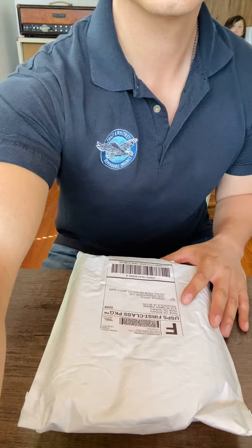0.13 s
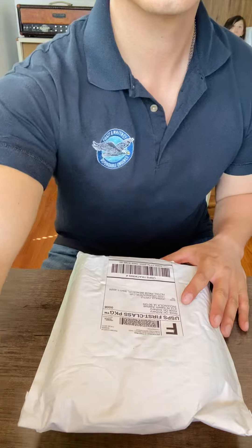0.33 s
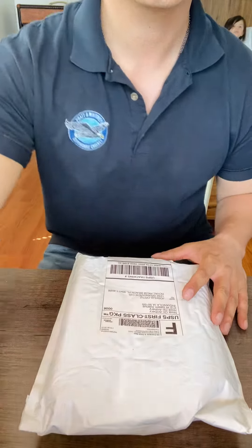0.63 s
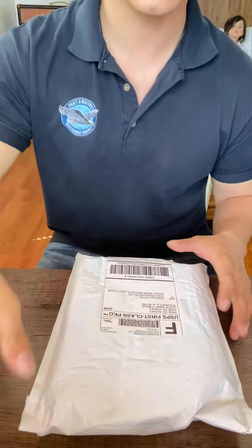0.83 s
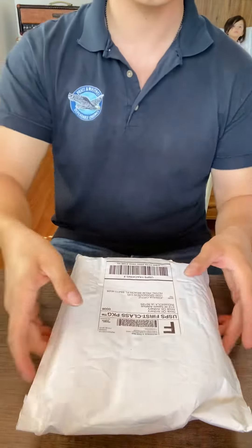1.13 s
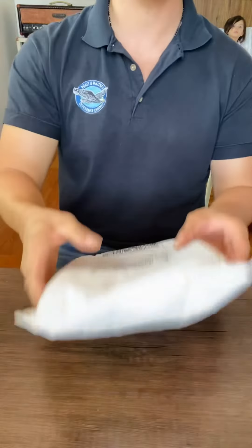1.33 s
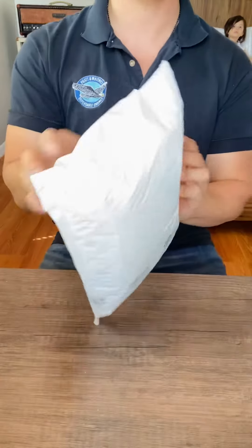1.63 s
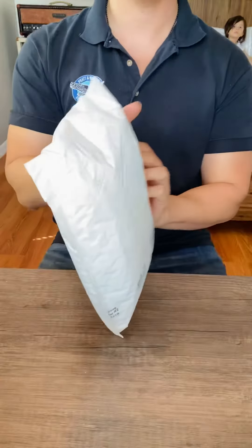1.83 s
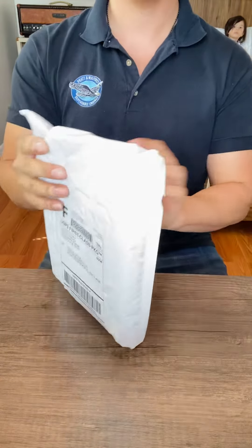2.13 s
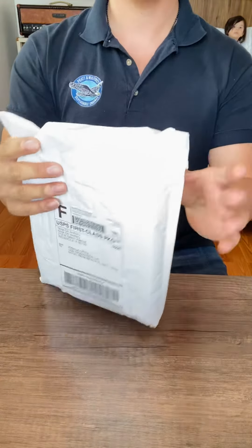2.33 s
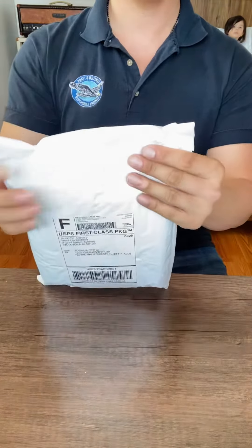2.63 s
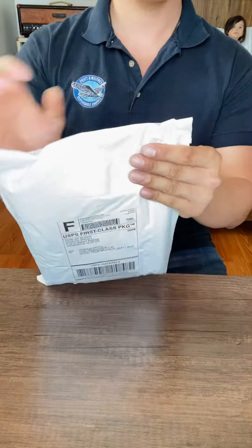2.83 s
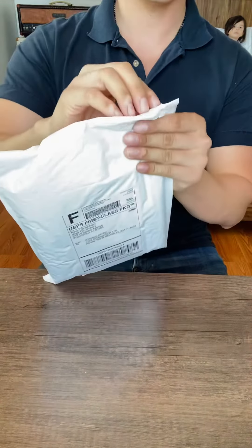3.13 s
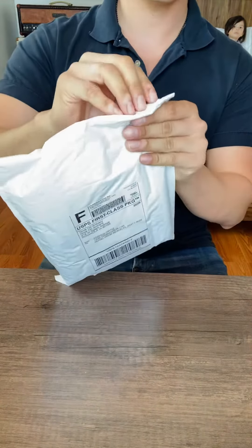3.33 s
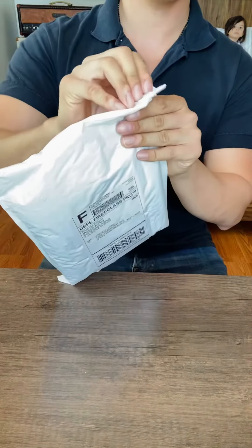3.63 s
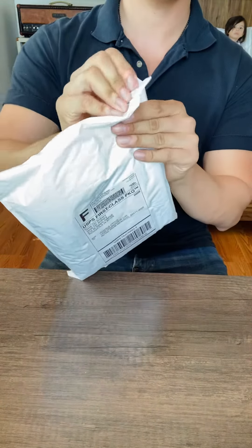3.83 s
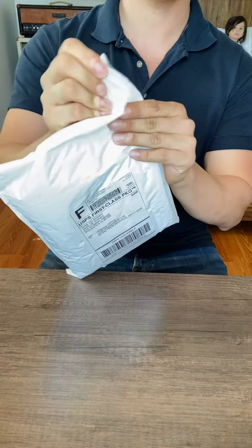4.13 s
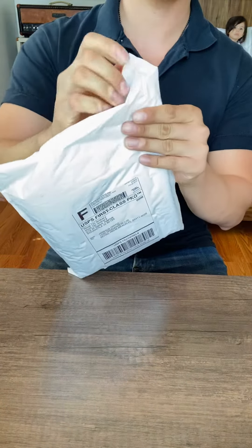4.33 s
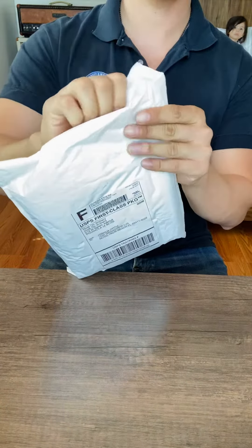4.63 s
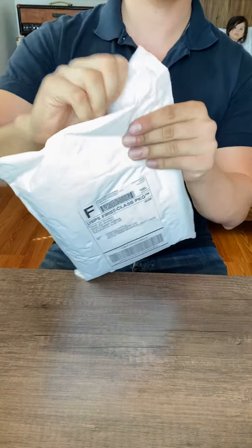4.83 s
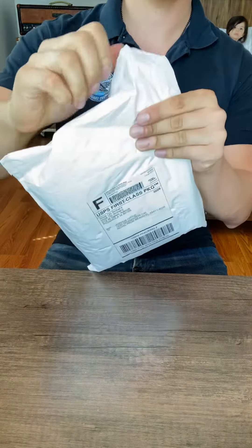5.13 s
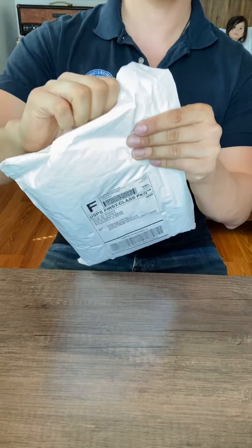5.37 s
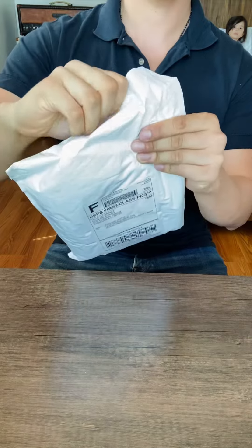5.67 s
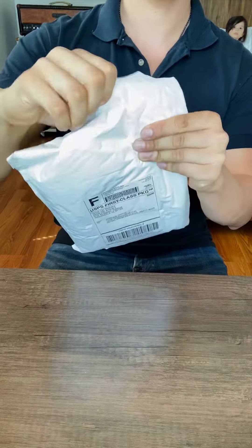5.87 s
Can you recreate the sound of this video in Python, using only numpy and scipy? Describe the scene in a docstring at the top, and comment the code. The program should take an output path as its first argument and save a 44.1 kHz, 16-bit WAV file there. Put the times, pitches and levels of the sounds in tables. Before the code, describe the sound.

Quiet room with a steady low rumble. Soft touches on the microphone come first, then a barely audible hiss of skin on film. From about one second, fine bright crinkling, dull scuffing and popping creases follow the handling of a plastic pouch. It is torn by three abrupt rips, the later ones with stronger low bumps. Close stereo pickup, short room reflections.

```python
"""A low room rumble runs throughout; two soft low bumps, then a palm slides faintly over film.
A plastic mailer is lifted off a table, turned in the hands and torn open in three short rips.
Fingers rub the film into a fine crackle of tiny clicks over hiss, and creases snap as short bursts.
Each rip is a quick run of slips, coloured by fixed resonances of the table; the bumps are sagging low tones.
All of it is close to a pair of microphone ports, with three room echoes taking turns behind."""
import sys
import numpy as np
from scipy import signal
from scipy.fft import rfft, irfft, next_fast_len
from scipy.io import wavfile

SR = 44100
rng = np.random.default_rng(int(sys.argv[2]) if len(sys.argv) > 2 else 0)


def digitize_waveform(pressure):
    """Quantize a signal to 16-bit integers and store it at the path in sys.argv[1].

    Rows of a 2-D input are taken as channels; values are limited to [-1, 1].
    """
    field = np.atleast_2d(pressure).T
    bounded = np.clip(field, -1, 1)
    quanta = np.round(bounded * 32767).astype(np.int16)
    wavfile.write(sys.argv[1], SR, quanta)


N = 264600
TIME = np.arange(N) / SR  # s
TAPS = 4096  # length of filters and single clicks, samples
HZ = np.fft.rfftfreq(TAPS, 1 / SR)
AGE = np.arange(TAPS) / SR  # s since a click began

# Colours are relative spectra: columns f/Hz, level per Hz/dB.
# steady rumble of the room
ROOM_TONE_COLOUR = [(15, -61), (30, -31), (45, 5), (65, 3), (120, -3.5), (200, -17), (330, -21.5),
                    (550, -38), (1200, -57), (5000, -56), (10000, -56), (14000, -77)]
ROOM_TONE_DB = -53.5
# skin on flat film
PALM_COLOUR = [(200, -6), (850, -5), (1300, -0.5), (2200, -1.5), (4000, -5.5), (7000, -8), (11000, -16),
               (14000, -29)]
# crackling and snapping film
FILM_COLOUR = [(150, -17.5), (330, -3.5), (650, -3.5), (1000, -4), (1380, 4.5), (1700, 0.5), (2050, 3.5),
               (2500, -2), (3100, 0), (5400, -1.5), (7500, -5), (11000, -7.5), (12500, -11), (16000, -33)]
# dull scuffing under the crackle
SCUFF_COLOUR = [(70, -13), (150, 1.5), (350, -0.5), (700, -1.5), (1300, -6.5), (2500, -34.5)]
# a slip of the tear
TEAR_COLOUR = [(60, -32), (130, -10), (310, -9), (700, -11.5), (1000, -9.5), (1400, -4.5), (2200, -7),
               (3100, -3.5), (5000, -5), (8000, -8.5), (11500, -11), (13000, -20), (16000, -58)]

# a palm sliding lightly over the film: t/s, level/dB
PALM_SLIDE = [(.05, -87), (.4, -84), (.48, -72.5), (.6, -66), (.75, -72.5), (.9, -81), (1.08, -81)]
# soft bumps: first two touches on the recorder, then hands, table and pouch:
# t/s, level/dB, middle pitch f/Hz, swell time/s
SOFT_BUMPS = [(.090, -38, 287, 0.0053), (.188, -39.5, 258, 0.0058), (.601, -53, 325, 0.015),
              (1.139, -39, 360, 0.0067), (1.395, -41, 577, 0.01), (2.060, -40, 200, 0.0069),
              (2.493, -40.5, 91.5, 0.0079), (3.613, -48.5, 115, 0.0078), (3.807, -46, 360, 0.0038),
              (4.104, -37.5, 339, 0.009), (4.333, -40.5, 254, 0.0052), (5.119, -27.5, 169, .003),
              (5.686, -24, 330, 0.0085), (5.934, -27, 114, 0.0042)]
# the hands' steady hold on the film, from the moment they pick it up: t/s, crackle level before trim/dB
STEADY_HOLD = [(1.1, -83), (1.14, -50.5), (1.65, -45), (1.77, -53.5), (2.25, -46.5), (2.8, -51.5),
               (2.98, -61.5), (3.25, -49), (3.55, -51.5), (3.9, -49), (4.25, -46.5), (4.5, -51),
               (4.9, -46.5), (5.26, -61.5), (5.3, -47.5), (5.98, -46.5)]
HOLD_SCUFF_DB, HOLD_TREBLE_DB = -10, -6.5  # scuffing against crackle, treble against the middle; before trims
# squeezes and pulls of the fingers, levels before trims:
# peak t/s, length/s, crackle level/dB, dull scuffing level/dB, treble against the middle/dB
FINGER_SQUEEZES = [(1.19, 0.077, -40.5, -46.5, -3), (1.373, 0.2, -42.5, -45, -3.5),
                   (1.486, 0.14, -43, -59, 4), (1.846, 0.16, -45, -50.5, -7.5), (2.039, 0.11, -34, -42, -7),
                   (2.562, 0.11, -33.5, -45.5, -4.5), (2.677, 0.13, -36.5, -45, -2.5),
                   (3.108, 0.097, -38.5, -51, -7.5), (3.394, 0.092, -48, -56, 0),
                   (3.626, 0.062, -41.5, -53.5, -2.5), (3.724, 0.068, -39, -56, -5),
                   (3.813, 0.098, -35, -58, -.5), (3.984, 0.17, -37.5, -63, -2.5),
                   (4.32, 0.044, -38, -47.5, 0), (4.627, 0.026, -39.5, -46.5, 1),
                   (4.721, 0.049, -34, -41.5, -9), (4.832, 0.15, -34.5, -47, -1),
                   (5.107, 0.062, -34, -38, -9), (5.297, 0.043, -39, -46, -6),
                   (5.357, 0.086, -42, -44.5, -17), (5.59, 0.36, -42.5, -56, -5),
                   (5.907, 0.064, -28.5, -37.5, -8.5)]
SQUEEZE_RISE = .42  # share of a squeeze spent building up; the rest is the release
# distinct single creases snapping, loud and soft: t/s, level over the first 3 ms before trim/dB, pitch f/Hz
CLEAR_SNAPS = [(1.1947, -29, 4940), (1.3963, -30, 1390), (1.4363, -29.5, 6100), (1.5009, -28, 4430),
               (1.5405, -26.5, 3480), (2.0114, -27, 1690), (2.0564, -21.5, 1390), (2.1883, -27, 5200),
               (2.354, -27, 3140), (2.5207, -31, 6900), (2.6901, -28, 1370), (2.7113, -21.5, 5600),
               (2.8028, -28.5, 3240), (2.8993, -38, 1400), (3.021, -33.5, 1280), (3.1182, -24, 5230),
               (3.3469, -33, 3420), (3.379, -32, 4060), (3.4, -28.5, 4040), (3.6159, -27, 6340),
               (3.7059, -31, 1730), (3.7811, -26.5, 4200), (3.9374, -25, 7040), (3.9691, -27.5, 3380),
               (3.9826, -28.5, 1310), (4.3283, -29, 2610), (4.3985, -38, 3680), (4.4329, -33.5, 3560),
               (4.5013, -35, 1160), (4.6266, -32.5, 2040), (4.6906, -29, 4000), (4.7862, -30, 3400),
               (5.0645, -28, 4800), (5.1145, -20, 1760), (5.3424, -22.5, 4440), (5.418, -36, 4050),
               (5.539, -28, 5300), (5.6721, -17, 4540), (5.7228, -17.5, 1920), (5.9313, -25.5, 1300)]
# runs of the tear, levels before trims; the first rip catches once and goes on:
# t/s, length/s, wait between slips/s, level at start/dB, level at end/dB,
# bass level/dB, treble level at start/dB, treble level at end/dB
TEAR_RUNS = [(4.045, .015, .005, -20, -15.5, -23, -6.5, 1.5),
             (4.0709, 0.046, .0045, -14, -18, -23.5, -7.5, 2.5),
             (4.8526, .043, .0054, -12.5, -14, -9, -7, -8),
             (5.6793, .0317, .0053, -11, -15.5, -12.5, 0, -10.5)]
SLIP_SLOWING = .1  # the pull slackens, so the waits grow along a run
SLIP_SPREAD_DB, SLIP_COLOUR_DB = 1, 3  # slips differ in strength and in colour
OPENING_BASS_DB = 6  # the bass grows by this much as the slit opens
SLIP_JITTER_S = .0004  # scatter of the moment of a slip
# fixed resonances of table and nearby surfaces that colour each rip: f/Hz, width/Hz, lift/dB
TABLE_RINGS = [(327, 30, 7), (1190, 45, 4), (1374, 70, 4), (1894, 45, 6), (3075, 70, 8)]

# difference between the microphone ports, fading out for long waves: f/Hz, phase by which left leads/rad
PORT_PHASE_LEAD = [(300, 0), (700, -.5), (1500, -.3), (2600, -.9), (3700, .2), (5100, -.8), (6200, -.15),
                   (8300, -.75), (10200, -1.7), (12000, -2.9), (16000, -3.1)]
# the same for level: f/Hz, left against right/dB
PORT_LEVEL_BALANCE = [(100, -7), (500, 6), (1500, 1.1), (4500, 2.9), (9000, -0.1)]
# time for the room's tail to die by 60 dB: f/Hz, time/s
ROOM_DECAY = [(150, 0.4), (530, 0.26), (1400, 0.53), (3700, 0.43), (9700, 0.39)]
# how strongly the room's tail is fed: f/Hz, level/dB
ROOM_FEED = [(100, -11.5), (500, -3.5), (1500, -7), (3500, -3), (7000, -6), (13000, -15)]
EDGE_HZ = 16400  # upper edge of the microphone band


def amp(db):
    """Decibels to gain."""
    return 10 ** (np.asarray(db) / 20)


def unit(x):
    """Scales to energy 1."""
    return x / np.sqrt(np.sum(x ** 2) + 1e-20)


def struck(x):
    """Scales to rms 1 over the first 3 ms."""
    return x / np.sqrt(np.mean(x[AGE < .003] ** 2))


def read(points, hz):
    """Reads a table on a log-frequency axis."""
    f, value = np.transpose(points)
    return np.interp(np.log(hz + 1), np.log(f + 1), value)


def add(mix, s, sound):
    """Lays a sound into the mix at s seconds."""
    part = mix[max(round(s * SR), 0):][:len(sound)]
    part += sound[:len(part)]


def causal(db):
    """The sharpest (minimum-phase) impulse response that has this colour, with energy 1."""
    log_gain = np.log(amp(np.maximum(db, db.max() - 100)))
    circle = np.concatenate([log_gain, log_gain[-2:0:-1]])
    return unit(np.fft.ifft(np.exp(np.conj(signal.hilbert(circle)))).real)


def coloured(x, db):
    """Passes x through a colour."""
    return signal.oaconvolve(x, causal(db))[:len(x)]


def wander(per_s):
    """Smooth chance of spread 1 that changes per_s times a second."""
    knots = rng.standard_normal(N // 64)
    # joining the knots by lines costs a third of the power
    return np.interp(TIME * per_s, np.arange(len(knots)), knots) * np.sqrt(3 / 2)


def room_tone():
    """A steady low rumble in the room, nearly the same at both ports."""
    common, left, right = (
        coloured(rng.standard_normal(N + TAPS), read(ROOM_TONE_COLOUR, HZ))[TAPS:] for _ in range(3))
    return amp(ROOM_TONE_DB) * (common + .05 * np.array([left, right]))


def bumps(sag=0.21, scuff=0.64, knock_db=-20, knock_ratio=3.3):
    """Each soft push gives a few low cycles that sag in pitch, a brief upper knock and a dull scuff."""
    out = np.zeros(N)
    for s, db, hz, swell in SOFT_BUMPS:
        u = AGE / swell
        pitch = hz * (1 + sag * (np.exp(-u / 2) - .5))
        turn = 2 * np.pi * np.cumsum(pitch) / SR
        knock = amp(knock_db) * np.exp(1 - u) * np.sin(knock_ratio * turn)
        tone = np.sin(turn) + knock
        too_high = 10 * np.log10(1 + (HZ / (hz * 1.69)) ** 12)
        too_low = 10 * np.log10(1 + (0.5 * hz / (HZ + 1)) ** 4)
        puff = coloured(rng.standard_normal(TAPS), -too_high - too_low)
        add(out, s, amp(db) * u * np.exp(1 - u) * (tone + scuff * puff))
    return out


def palm(catch_db=2):
    """Skin sliding on the flat film gives a faint hiss that catches a little."""
    push = np.interp(TIME, *np.transpose(PALM_SLIDE)) + catch_db * wander(59.8)
    return coloured(rng.standard_normal(N), read(PALM_COLOUR, HZ)) * amp(push)


def burst(decay, crack, lag=0.000498):
    """One buckle and the flurry of tiny ones it sets off; high notes cross the film first (lag in s at 1 kHz)."""
    u = AGE / decay
    flurry = unit(rng.standard_normal(TAPS) * np.sqrt(u) * np.exp(-u))
    flurry[0] += crack * rng.choice([-1, 1])
    return irfft(rfft(flurry) * np.exp(-4j * np.pi * lag * np.sqrt(1000 * HZ)))


def crease_colour(hz, lift_db, octaves=0.35):
    """The film's colour, lifted around the pitch of one crease."""
    return read(FILM_COLOUR, HZ) + lift_db * np.exp(-(np.log2((HZ + 1) / hz) / octaves) ** 2)


def hands():
    """The steady hold plus each squeeze, which builds and lets go: crackle, scuffing and treble in dB over time."""
    power = amp(np.interp(TIME, *np.transpose(STEADY_HOLD))) ** 2
    scuffing = power * amp(HOLD_SCUFF_DB) ** 2
    bright = power * HOLD_TREBLE_DB
    for s, length, db, scuff_db, treble_db in FINGER_SQUEEZES:
        side = length * np.where(TIME < s, SQUEEZE_RISE, 1 - SQUEEZE_RISE)
        shape = np.exp(-2 * np.abs((TIME - s) / side) ** 1.25)
        power = power + shape * amp(db) ** 2
        scuffing = scuffing + shape * amp(scuff_db) ** 2
        bright = bright + shape * amp(db) ** 2 * treble_db
    # the treble is an average weighted by crackle power
    return 10 * np.log10(power), 10 * np.log10(scuffing), bright / power


def crackle(per_s, spread_db, hiss, patchy_db):
    """Countless small creases of many pitches, each family coming and going, over a hiss of rubbing; rms 1."""
    out = np.zeros(N)
    for hz in np.geomspace(1100, 9000, num=12):
        size_db = spread_db * np.minimum(rng.exponential(1, N), 3) + patchy_db * wander(25)
        happens = rng.random(N) < per_s / SR / 12
        clicks = amp(size_db) * rng.choice([-1, 1], N) * happens
        crease = coloured(burst(decay=0.00028, crack=0.71), crease_colour(hz, lift_db=10.0))
        out += signal.oaconvolve(clicks, unit(crease))[:N]
    rubbing = coloured(rng.standard_normal(N), read(FILM_COLOUR, HZ))
    return np.sqrt(N) * unit(unit(out) + hiss * unit(rubbing))


def flaps(per_s=110, level_db=15.5, spread_db=2.0, lift_db=14):
    """Broad, slack folds of the pouch turn over with small hollow knocks."""
    out = np.zeros(N)
    for hz in np.geomspace(1050, 1750, num=8):
        size = amp(level_db + spread_db * np.minimum(rng.exponential(1, N), 2.5))
        clicks = size * (rng.random(N) < per_s / SR / 8)
        knock = coloured(burst(decay=0.00063, crack=0.69), crease_colour(hz, lift_db, octaves=0.28))
        out += signal.oaconvolve(clicks, unit(knock))[:N]
    return out


def rustle(crackle_trim_db=-1.24, scuff_trim_db=-2, treble_trim_db=4.5, clump_db=2):
    """Fingers crumple and rub the film in little clumps; the padded contents answer with a duller scuffing."""
    effort, dull, treble = hands()
    grip = amp(clump_db * wander(90)) * (TIME > STEADY_HOLD[0][0])
    fine = crackle(per_s=1100, spread_db=5.2, hiss=.45, patchy_db=3) + flaps()
    # taut film crackles brightly, slack film dully; the divisor offsets the tilt's change of loudness
    middle = signal.sosfiltfilt(signal.butter(2, 4500, fs=SR, output="sos"), fine)
    tilt = amp(treble + treble_trim_db)
    fine = (middle + tilt * (fine - middle)) / np.sqrt(0.87 + 0.36 * tilt ** 2)
    scuffs = rng.standard_normal(N) * (rng.random(N) < 700 / SR)  # about 700 a second
    low = np.sqrt(N) * unit(coloured(scuffs, read(SCUFF_COLOUR, HZ)))
    return grip * (fine * amp(effort + crackle_trim_db) + low * amp(dull + scuff_trim_db))


def small_snaps(count=50, typical_db=-37, follow=0.77, spread_db=3.0,
                slack_hz=1450, taut_hz=4100, slack_share=.3):
    """Further creases flip at chance moments, louder as the hands work harder: t/s, level before trim/dB, f/Hz."""
    when, loud, kind, detune = rng.random((count, 4)).T
    s = np.interp(np.arange(count) + when, [0, count], [STEADY_HOLD[1][0], TIME[-1]])
    effort = np.interp(s, TIME, hands()[0])
    db = typical_db + follow * (effort - effort.mean()) + spread_db * (2 * loud - 1)
    hz = np.where(kind < slack_share, slack_hz, taut_hz) * 2 ** (detune - .5)
    return list(zip(s, db, hz))


def snaps(trim_db=-2.0, decay=0.0014):
    """Single creases flip over with a click about a millisecond long; the smaller the crease, the quicker."""
    out = np.zeros(N)
    for s, db, hz in list(CLEAR_SNAPS) + small_snaps():
        flip = burst(decay=decay * (2500 / hz) ** 0.28, crack=0.63, lag=.0002)
        snap = coloured(flip, crease_colour(hz, lift_db=9.0, octaves=0.74))
        add(out, s, amp(db + trim_db) * struck(snap))
    return out


def slips():
    """Each run of the tear is a nearly regular, slowing train of slips: t/s, then level, bass and treble/dB."""
    rows = []
    for start, length, wait, first_db, last_db, bass_db, first_treble, last_treble in TEAR_RUNS:
        along = np.linspace(0, 1, round(length / wait) + 1)
        late, strong, deep, bright = rng.standard_normal((len(along), 4)).T
        s = start + length * along * (1 + SLIP_SLOWING * (along - 1))
        s = s + SLIP_JITTER_S * late * (along > 0)
        db = first_db + (last_db - first_db) * along + SLIP_SPREAD_DB * strong
        bass = bass_db + OPENING_BASS_DB * (along - .5) + SLIP_COLOUR_DB * deep
        treble = first_treble + (last_treble - first_treble) * along + SLIP_COLOUR_DB * bright
        rows += zip(s, db, bass, treble)
    return rows


def rips(trim_db=-1.05, bass_trim_db=10, treble_trim_db=3, shred=0.57, crack=0.44):
    """The tear sticks and slips every few milliseconds; each slip cracks and shreds on, coloured by the table."""
    out = np.zeros(N)
    ring = sum(db / (1 + (2 * (HZ - hz) / width) ** 2) for hz, width, db in TABLE_RINGS)
    lows = 1 / (1 + (HZ / 800) ** 4)
    highs = 1 - 1 / (1 + (HZ / 4500) ** 6)
    for s, db, bass, treble in slips():
        colour = read(TEAR_COLOUR, HZ) + ring
        colour = colour + (bass + bass_trim_db) * lows + (treble + treble_trim_db) * highs
        # the brighter the slip, the cleaner the break
        clean = amp(treble + 2)
        slip = burst(decay=0.00094 / np.sqrt(clean), crack=crack * clean, lag=0.00022)
        slip = slip + shred * burst(decay=0.0034, crack=0)
        add(out, s, amp(db + trim_db) * struck(coloured(slip, colour)))
    return out


def ports(x):
    """The two close ports differ a little in phase and level, except for long waves."""
    size = next_fast_len(N + TAPS)
    hz = np.fft.rfftfreq(size, 1 / SR)
    short = hz ** 2 / (hz ** 2 + 300 ** 2)
    # each port takes half of the difference
    half = np.exp(.5j * short * read(PORT_PHASE_LEAD, hz)) * amp(short * read(PORT_LEVEL_BALANCE, hz) / 2)
    return irfft(rfft(x, size) * np.array([half, 1 / half]), size)[:, :N]


def room(x, near_db=-10, near_decay=0.0041):
    """Quick reflections from table and body, then a tail that dies band by band; each port gets its own."""
    age = np.arange(SR) / SR
    hz, t, z = signal.stft(rng.standard_normal((2, SR)) * (age > .005), SR, nperseg=256)
    t60 = read(ROOM_DECAY, hz)[:, None]
    fade = np.exp(-np.log(1000) * t / t60)
    even_energy = np.sqrt(2 * np.log(1000) / t60 / SR)  # long and short tails carry alike
    z *= amp(read(ROOM_FEED, hz))[:, None] * fade * even_energy
    tail = signal.istft(z, SR, nperseg=256)[1][:, :SR]
    near_shape = (age > .0008) * np.exp(-age / near_decay)
    near = np.array([unit(rng.standard_normal(SR) * near_shape) for _ in range(2)])
    mid, side = tail + amp(near_db) * near
    # long waves reach both ports alike
    side = signal.lfilter(*signal.butter(1, 400, "high", fs=SR), side)
    echo = np.array([mid + side, mid - side]) / np.sqrt(2)
    return signal.fftconvolve(x[None], echo, axes=1)[:, :N]


def turning_echo(x):
    """Three room echoes fade into each other in turn, one round every 2.4 s."""
    turn = 2 * np.pi * TIME / 2.4
    weights = np.maximum(np.cos(turn - 2 * np.pi * np.arange(3)[:, None] / 3), 0)
    return sum(room(x * w) for w in weights / np.linalg.norm(weights, axis=0))


def scene():
    """The mailer close to the ports, its echo, and the room's rumble."""
    mailer = bumps() + palm() + rustle() + snaps() + rips()
    return ports(mailer) + turning_echo(mailer) + room_tone()


def record(dry):
    """The highest peaks are rounded off; then the microphone band is limited."""
    rounded = dry / (1 + dry ** 6) ** (1 / 6)
    band = signal.firwin(511, EDGE_HZ, window=("kaiser", 9), fs=SR)
    return signal.oaconvolve(rounded, band[None], "same")


dry = scene()
out = record(dry)
digitize_waveform(out)
```